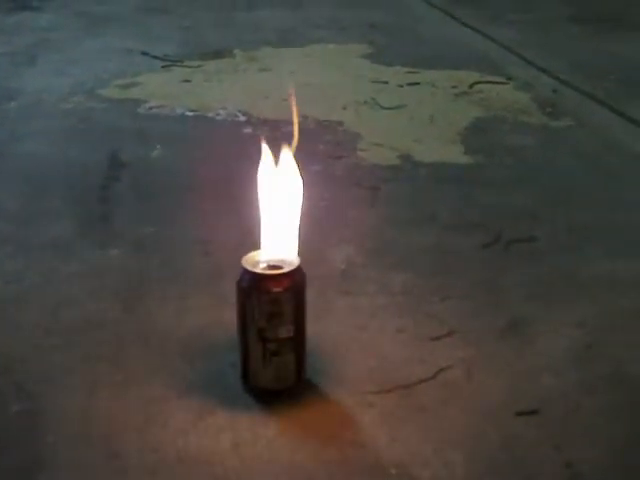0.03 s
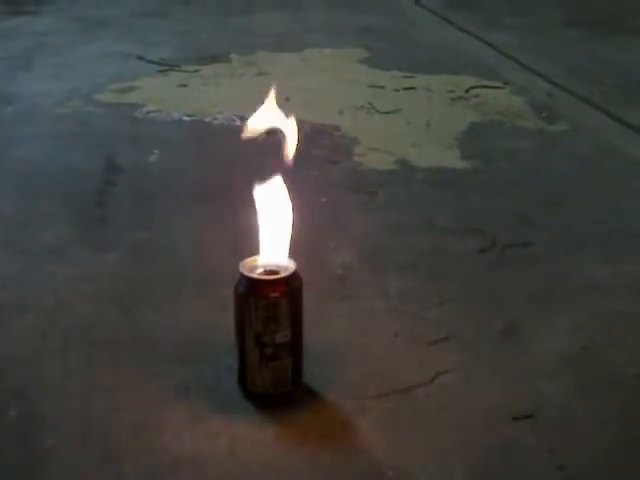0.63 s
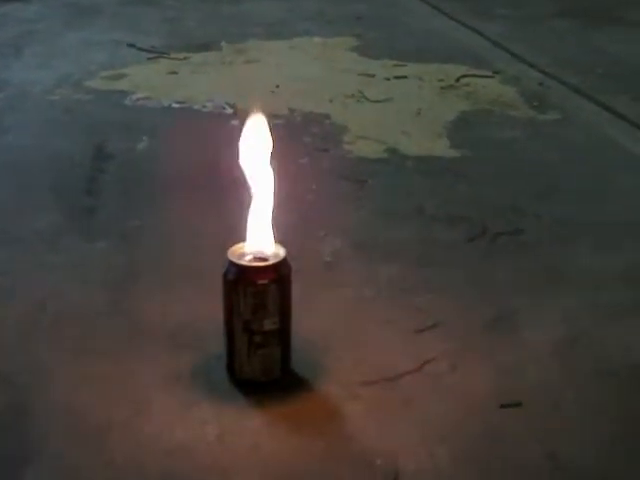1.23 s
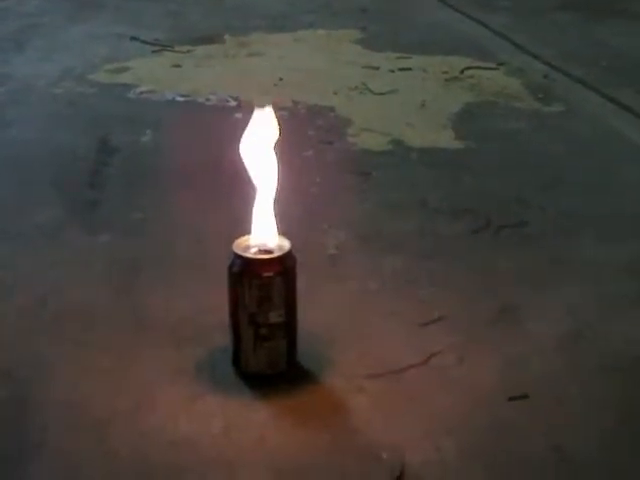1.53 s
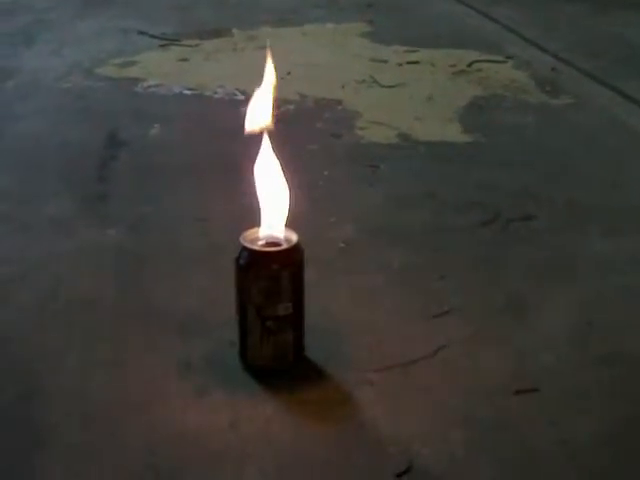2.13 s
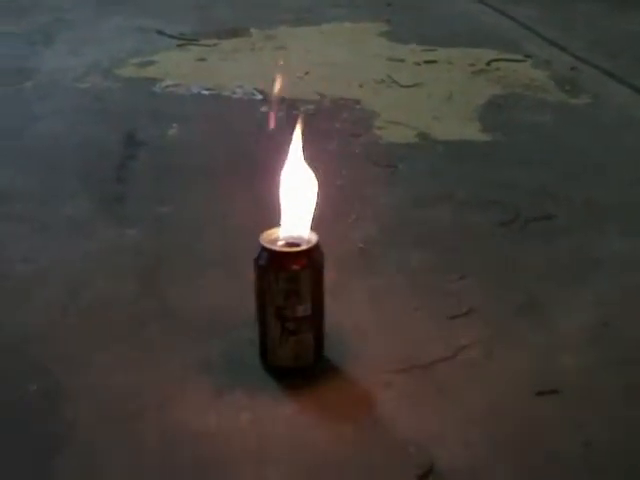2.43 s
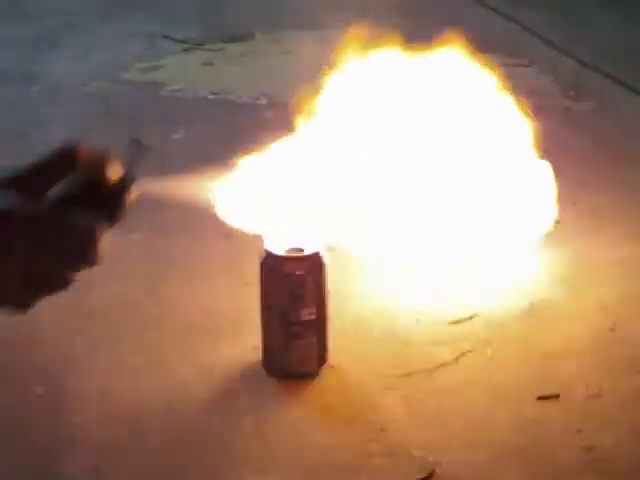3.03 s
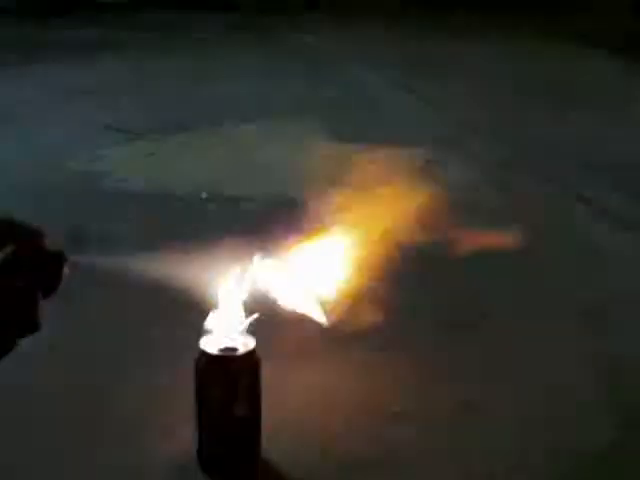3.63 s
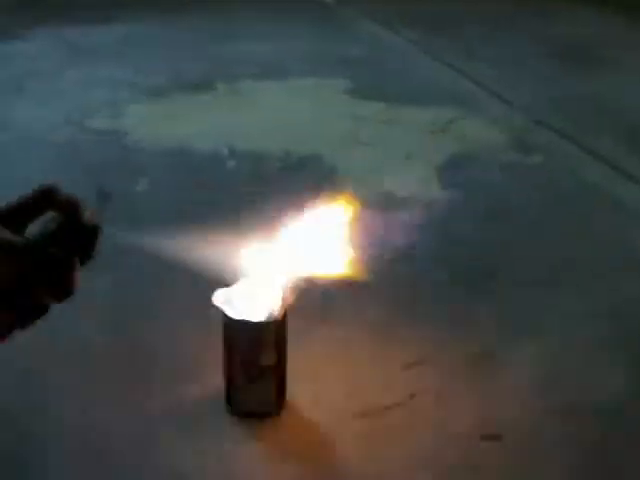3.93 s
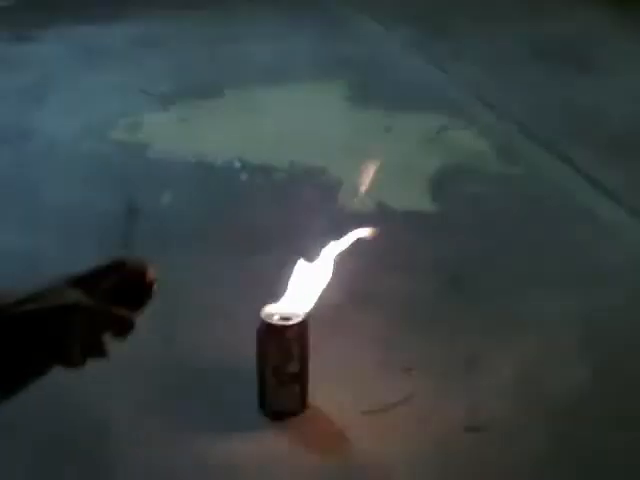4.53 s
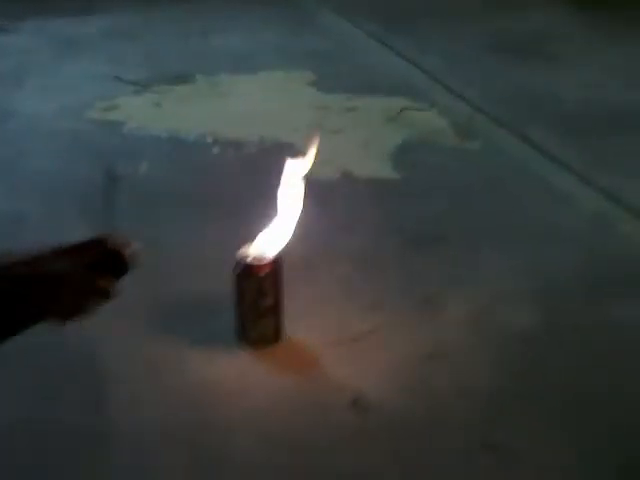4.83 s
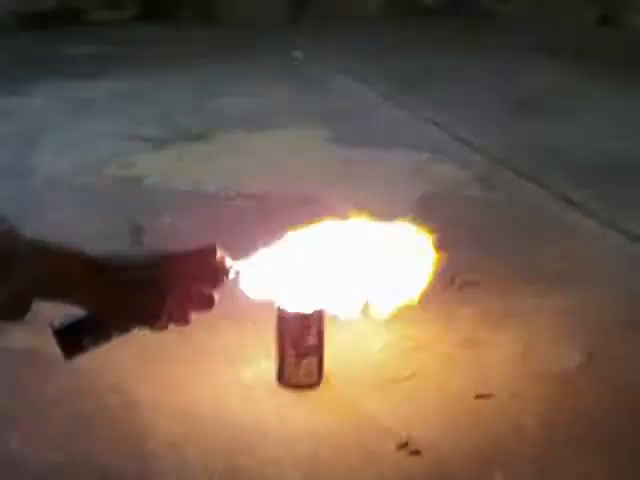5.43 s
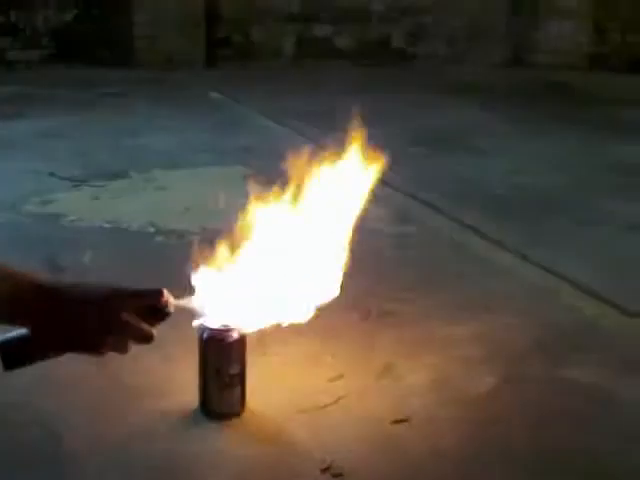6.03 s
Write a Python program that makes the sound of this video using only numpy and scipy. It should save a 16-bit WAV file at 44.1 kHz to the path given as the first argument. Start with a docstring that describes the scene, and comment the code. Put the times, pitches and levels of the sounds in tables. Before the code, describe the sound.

Faint shoe scuffs and a couple of small knocks sound over a low rumble and a distant engine in a concrete hall. Then an aerosol can hisses sharply, and the mist catches with a puff and burns in a deep, surging roar. It stops, and a hand rubs and taps on the microphone. A second hissing spray ignites and roars steadily to the end.

```python
"""In a concrete hall, over rumble and far traffic, an engine drones and shoes scuff the floor.
An aerosol is sprayed twice through a small flame on a drink can: the turbulent jet hisses at the
nozzle, and the mist ignites with a puff and burns in a flapping roar. A hand knocks on the camera,
ringing the modes of its shell, and rubs over it with stick-slip friction between the bursts."""
import sys
import numpy as np
from scipy import signal
from scipy.fft import rfft, irfft
from scipy.io import wavfile
from scipy.ndimage import uniform_filter1d

SR = 44100
rng = np.random.default_rng(int(sys.argv[2]) if len(sys.argv) > 2 else 0)


def materialize(psi):
    """Save the field psi as 16-bit PCM at rate SR to the path in sys.argv[1].

    A 1-D psi becomes a single channel; in a 2-D psi each row is a channel.
    """
    bounded = np.clip(np.atleast_2d(psi).T, -1, 1)
    quanta = np.round(bounded * 32767).astype(np.int16)
    wavfile.write(sys.argv[1], SR, quanta)


N = 276948
TIME = np.arange(N) / SR


def from_db(db):
    """Amplitude ratio of a level."""
    return 10 ** (np.asarray(db) / 20)


def unit_rms(x):
    """Normalisation to unit power."""
    return x / np.sqrt(np.mean(x ** 2) + 1e-20)


def level_curve(rows):
    """Gain interpolated in dB between points in time."""
    return from_db(np.interp(TIME, *np.transpose(rows)))


def bin_gains(spectrum):
    """Frequency response, interpolated in dB on a logarithmic axis."""
    hz, *columns = np.transpose(spectrum)
    bins = np.arange(1, N // 2 + 2) * SR / N
    return from_db([np.interp(np.log(bins), np.log(hz), db) for db in columns])


def coloured(x, spectrum):
    """Spectral shaping, at unit power."""
    return unit_rms(irfft(rfft(x) * bin_gains(spectrum), N))


def drift(hz):
    """Slow random fluctuation: low-passed noise of unit power."""
    step = 40  # samples between points
    pole = np.exp(-2 * np.pi * hz * step / SR)
    noise = rng.standard_normal(N // step + 2002)
    slow = signal.lfilter([1], [1, -2 * pole, pole * pole], noise)[2000:]
    return np.interp(np.arange(N) / step, np.arange(len(slow)), unit_rms(slow))


def grains(per_s, spread_db):
    """Shot noise: random impulses of uneven size and sign, at unit power."""
    sizes = from_db(spread_db * np.minimum(rng.exponential(1, N), 4)) * rng.choice([-1, 1], N)
    return unit_rms(sizes * (rng.random(N) < per_s / SR))


def held(start, rise, until, decay_db_per_s):
    """Envelope with a linear rise, a hold and an exponential decay."""
    return np.clip((TIME - start) / rise, 0, 1) * from_db(-decay_db_per_s * np.maximum(TIME - until, 0))


def strokes(rows, sharpness):
    """Summed swells. Each row: peak time, rise and fall in seconds, level in dB."""
    return sum(from_db(db) * np.interp(TIME - peak, [-rise, 0, fall], [0, 1, 0]) ** sharpness
               for peak, rise, fall, db in rows)


def resonate(x, hz, width_hz, boost_db):
    """Resonance lifts a narrow band."""
    r = np.exp(-np.pi * width_hz / SR)
    poles = [1, -2 * r * np.cos(2 * np.pi * hz / SR), r * r]
    band = signal.lfilter(np.array([1, 0, -1]) * (1 - r * r) / 2, poles, x)
    return x + (from_db(boost_db) - 1) * band


def ring(force, hz, t60):
    """Damped oscillator: each impulse starts a decaying sine."""
    r, w = from_db(-60 / (t60 * SR)), 2 * np.pi * hz / SR
    return signal.lfilter([0, np.sin(w)], [1, -2 * r * np.cos(w), r * r], force + 1e-18)


def reflected(x, latest_s, echo_db, count):
    """Interference with early reflections ripples the spectrum; power is kept."""
    lags = (rng.uniform(.1, 1, count) * latest_s * SR).astype(int)
    gain = from_db(echo_db)
    echoes = sum(rng.choice([-1, 1]) * np.pad(x, [(0, 0), (lag, 0)])[:, :N] for lag in lags)
    return (x + gain * echoes / np.sqrt(count)) / np.sqrt(1 + gain ** 2)


# What the two microphone ports do not share. Each row: frequency in Hz, side relative to mid in dB.
SIDE_SPECTRUM = [(60, -18), (150, -34), (250, -25.5), (500, -22), (1000, -12), (2500, -14), (4500, -5.5),
                 (7000, -0.5), (10000, -3), (15000, -3.5)]

def air_noise():
    """Spatial coherence: white noise at two close ports is alike in the bass, less so in the treble."""
    mid, side = rfft(rng.standard_normal((2, N)))
    side_gain = bin_gains(SIDE_SPECTRUM)
    ports = unit_rms(mid + side_gain * side * [[1], [-1]])
    return unit_rms(irfft(ports / np.hypot(1, side_gain), N))


# Spectra of the rumble and the traffic. Each row: frequency in Hz, relative level in dB.
RUMBLE_SPECTRUM = [(15, -4), (35, -7.5), (50, 0.5), (75, 0.5), (115, -3.5), (170, -9.5), (250, -6.5),
                   (330, -11), (600, -31), (1500, -80)]
TRAFFIC_SPECTRUM = [(150, -16), (330, 0.5), (650, 1.5), (1100, -4), (1700, -10.5), (3000, -19), (6000, -33)]
# Spectrum of the air hiss. Each row: frequency in Hz, left and right relative levels in dB.
AIR_SPECTRUM = [(1200, 8, -20), (3250, 7, 4.5), (4170, 3.5, 3.5), (6200, 2.5, 4.5), (8100, 8, 8),
                (9540, 12, 0), (11500, 1, -4), (15000, -11, -11)]
# Swells of the traffic and the air hiss. Each row: time in seconds, level in dB.
TRAFFIC_LEVELS = [(0, -53.5), (1.2, -51), (1.55, -48.5), (2.5, -50.5)]
AIR_LEVELS = [(0, -54.5), (.17, -64), (.65, -59), (1.5, -57), (2.7, -54.5)]

def hall():
    """Ambient noise is a superposition of steady rumble, far traffic and air hiss."""
    rumble = from_db(-47) * coloured(air_noise(), RUMBLE_SPECTRUM)
    traffic = level_curve(TRAFFIC_LEVELS) * coloured(air_noise(), TRAFFIC_SPECTRUM)
    air = level_curve(AIR_LEVELS) * coloured(air_noise(), AIR_SPECTRUM)
    return rumble + traffic + air


# The engine's firing rate and overtones. Each row: frequency in Hz, level in dB before the load gain.
ENGINE_HARMONICS = [(80.7, -47), (161.5, -50.5), (242.2, -60)]

def engine():
    """Periodic firing gives a harmonic series, which grows louder under load and then eases off."""
    clock = np.cumsum(1 + 0.0089 * drift(hz=2.9)) / SR
    harmonics = sum(from_db(db + 2.2 * drift(hz=3.1)) * np.sin(2 * np.pi * hz * clock)
                    for hz, db in ENGINE_HARMONICS)
    idle = from_db(-15.5)
    load = from_db(-0.5) * held(start=1.72, rise=0.35, until=2.07, decay_db_per_s=4)
    return np.sqrt(2) * (idle + load) * harmonics


def whine(hz=7867, level_db=-61):
    """A faint pure tone from the camera's electronics, in the right channel."""
    return from_db(level_db) * np.sin(2 * np.pi * hz * TIME) * [[0], [1]]


# Spectrum of grit under a sole. Each row: frequency in Hz, left and right relative levels in dB.
GRIT_SPECTRUM = [(500, -17, -8), (1160, -2, 1.5), (2200, 2.5, -1.3), (2960, -2, -5), (4330, -1.5, -5.5),
                 (6260, -8, -8), (7940, -1, 1), (9600, 5.5, -10), (11500, -7, -13), (15000, -18, -22)]
# Shoe scuffs. Each row: peak time in seconds, level in dB, resonance in Hz, its boost in dB.
SHOE_SCUFFS = [(.262, -45.5, 3040, 8.5), (0.978, -45, 1900, 10), (1.236, -52.5, 2600, 0),
               (1.55, -50.5, 3000, 4), (1.96, -59, 3300, 3), (2.08, -53.5, 2400, 6), (2.6, -51.5, 3200, 2)]

def shoes(rise_s=0.023, fall_s=0.1):
    """Sliding friction: soles drag grit over concrete, each with its own resonance; a heel taps once."""
    grit = coloured(air_noise() + .5 * grains(per_s=1800, spread_db=3), GRIT_SPECTRUM)
    scuffs = sum(strokes([(s, rise_s, fall_s, db)], sharpness=0.71) * resonate(grit, hz, 710, boost_db)
                 for s, db, hz, boost_db in SHOE_SCUFFS)
    heel = strokes([(1.4925, .0005, .016, -53)], sharpness=1.1)
    return scuffs + heel * resonate(grit, hz=1560, width_hz=610, boost_db=19.5)


# Knocks on the camera. Each row: start in seconds, force level in dB, left minus right in dB,
# contact bandwidth in Hz, chatter decay time in seconds.
CONTACTS = [(0.7004, -21, 1, 2000, 0.01), (0.74, -20, -6, 1400, .008), (0.8365, -36.5, -6, 6000, .006),
            (1.9754, -34.5, 1, 6000, .004), (4.4452, -20.5, -1, 9000, 0.0037),
            (4.6360, -9, -9, 14000, .0015), (4.7315, -22.5, -10, 3000, 0.0011), (4.7666, -7, -5, 900, .003),
            (4.8, -20.5, -15, 5950, 0.0037), (4.9334, -18.5, -9, 7000, .004), (4.995, -8, -1, 800, 0.0047),
            (5.11, -32, -9, 1800, 0.0026)]
# Modes of the camera shell. Each row: frequency in Hz, relative level in dB, 60 dB decay in seconds.
SHELL_MODES = [(430, -33, .018), (1020, -20.5, 0.012), (1490, -19.5, 0.0085), (2460, -18, 0.0067),
               (3360, -18.5, 0.0068), (4440, -7, 0.0029), (5740, -11.5, 0.0047), (6730, -4, 0.0037),
               (8100, -1, 0.0023), (9400, 0.5, 0.0025)]

def knocks():
    """Impact excitation: a blow and its chatter ring the shell's modes; softer contacts sound duller."""
    force, t = np.zeros((2, N)), np.arange(SR // 20) / SR
    for start, level_db, pan_db, bandwidth_hz, chatter_s in CONTACTS:
        chatter = np.exp(-t / chatter_s) * np.sqrt(2 / (chatter_s * SR))
        blow = 2.2 * rng.standard_normal((2, len(t))) * chatter
        blow[:, 0] += 1  # the first impact
        softness = np.exp(-2 * np.pi * bandwidth_hz / SR)
        port_gains = from_db(level_db + pan_db * np.array([[.5], [-.5]]))
        at = round(start * SR)
        force[:, at:at + len(t)] += port_gains * signal.lfilter([1 - softness], [1, -softness], blow)
    modes = sum((-1) ** k * from_db(db - 4) * ring(force, hz, t60)
                for k, (hz, db, t60) in enumerate(SHELL_MODES))
    return signal.sosfilt(signal.butter(4, 12300, fs=SR, output="sos"), modes)


def thin_hiss():
    """Narrow-band noise swells faintly and fades before the first burst."""
    band = coloured(air_noise(), [(2400, -37), (3230, 2), (4000, -34)])
    return strokes([(1.9, .42, .95, -67)], sharpness=0.45) * band


def floor_bounce(x, delay_s, sway, echo_db):
    """Comb filtering by the floor's echo; the notches slide as the hand wanders."""
    now = np.arange(N)
    then = now - delay_s * SR * (1 + sway * drift(hz=0.85))
    return x + from_db(echo_db) * np.array([np.interp(then, now, channel) for channel in x])


# Spectrum of the jet. Each row: frequency in Hz, left and right relative levels in dB.
JET_SPECTRUM = [(300, -49, -32), (1050, -12.5, -12.5), (1890, -15.5, -16.5), (3200, -17.5, -17.5),
                (5030, -15, -15), (6880, -15, -12.5), (7970, -5, -3.5), (8200, -6.5, -5.5), (9300, 1, -8.5),
                (10300, -2, -15), (11000, -7.5, -11.5), (13100, -10, -17), (15400, -18.5, -14)]
# Spectrum of the mist. Each row: frequency in Hz, relative level in dB.
MIST_SPECTRUM = [(600, -23), (1100, -26), (1900, -9), (3200, 8), (5000, -0.5), (7000, 8), (12000, -23),
                 (15000, -23)]
# Early spurts. Each row: peak time in seconds, added flow in dB relative to the steady jet.
JET_SPURTS = [(2.9, 4.5), (3.11, 3.5), (3.28, -0.5), (3.39, 0.5)]
# Presses of the nozzle. Each row: start and end in seconds, jet and mist levels in dB,
# mist resonance in Hz, its boost in dB.
NOZZLE_PRESSES = [(2.84, 4.143, -28.5, -41.6, 1700, 6), (5.292, 6.3, -30.5, -41, 2450, 6)]

def spray(spurt_rise_s=0.17, spurt_fall_s=0.09):
    """Jet noise: the nozzle sputters and hisses; the duller rush of the mist grows less with flow."""
    flow = 1 + strokes([(s, spurt_rise_s, spurt_fall_s, db) for s, db in JET_SPURTS], sharpness=1.16)
    sputter = from_db(drift(hz=78))
    jet = sputter * flow * coloured(air_noise(), JET_SPECTRUM)
    mist = flow ** 0.75 * coloured(air_noise(), MIST_SPECTRUM)
    hiss = 0
    for start, end, jet_db, mist_db, hz, boost_db in NOZZLE_PRESSES:
        valve = held(start, rise=0.083, until=end, decay_db_per_s=259.5)
        hollow_mist = resonate(mist, hz, width_hz=600, boost_db=boost_db)
        hiss += valve * (from_db(jet_db) * jet + from_db(mist_db) * hollow_mist)
    hiss = floor_bounce(hiss, delay_s=0.001092, sway=0.049, echo_db=-15)
    return reflected(hiss, latest_s=.02, echo_db=-8.5, count=24)


def blaze(flares, decay_db_per_s, sag_db_per_s=5.5):
    """Exponential decay: a flare sags while fed and dies when the fuel stops; the strongest leads."""
    envelopes = []
    for start, rise, until, db in flares:
        fed_s = np.maximum(np.minimum(TIME, until) - start - rise, 0)
        envelopes.append(from_db(db - sag_db_per_s * fed_s) * held(start, rise, until, decay_db_per_s))
    return np.max(envelopes, axis=0)


# Spectrum of the roar. Each row: frequency in Hz, relative level in dB.
ROAR_SPECTRUM = [(20, -13), (38, -5), (50, -15.5), (70, 0), (84, -0.5), (100, -6), (114, 0.5), (138, -7.5),
                 (160, -5.5), (210, -15), (240, -10.5), (260, -15), (400, -19.5), (700, -41.5), (4000, -99)]
# Resonances in the roar. Each row: frequency and bandwidth in Hz, boost in dB.
ROAR_RESONANCES = [(282, 15, 5), (350.7, 12.7, 8)]

def flame_front(flap_resonance, limit=4.2):
    """Irregular oscillation: the flame flaps at steady power; saturation rounds the widest swings."""
    flaps = coloured(air_noise() + 0.67 * grains(per_s=270, spread_db=2), ROAR_SPECTRUM)
    for hz, width_hz, boost_db in [flap_resonance, *ROAR_RESONANCES]:
        flaps = resonate(flaps, hz, width_hz, boost_db)
    running_rms = np.sqrt(uniform_filter1d(np.mean(flaps ** 2, 0), size=2000))
    return limit * np.tanh(flaps / running_rms / limit)


# Spectrum of the fire's turbulence. Each row: frequency in Hz, relative level in dB.
TURBULENCE_SPECTRUM = [(250, -9), (450, 3.5), (620, -0.5), (830, -7.5), (1050, -7), (1400, -13.5),
                       (2000, -11), (3500, -20.5), (8000, -23), (14000, -34)]
# Puffs as the mist catches. Each row: peak time in seconds, level in dB.
IGNITION_PUFFS = [(2.895, -34), (3.982, -38), (5.421, -31.5)]
# Flapping per burst, deeper in the big first one. Each row: frequency and bandwidth in Hz, boost in dB.
FLAP_RESONANCES = [(81.7, 35, 4), (162.8, 24, 4.5)]
# Flares, one list per burst. Each row: start, rise time and end in seconds, level in dB.
BURST_FLARES = [
    [(2.885, 0.012, 3.344, -16), (3.38, 0.088, 3.564, -12), (3.6, 0.076, 3.82, -21),
     (3.965, 0.029, 4.13, -11.5)],
    [(5.345, .015, 5.4, -28.5), (5.397, .025, 5.43, -16.5), (5.4, .3, 6.3, -12.8)],
]

def fireball(puff_rise_s=.012, puff_fall_s=0.14):
    """Combustion noise: the mist catches with a puff and roars; each flap modulates the turbulence."""
    turbulence = coloured(air_noise() + .5 * grains(per_s=500, spread_db=3.5), TURBULENCE_SPECTRUM)
    puffs = strokes([(s, puff_rise_s, puff_fall_s, db) for s, db in IGNITION_PUFFS], sharpness=2.9)
    roar, rush = 0, puffs * turbulence
    for flap_resonance, flares in zip(FLAP_RESONANCES, BURST_FLARES):
        flaps = flame_front(flap_resonance)
        burn = blaze(flares, decay_db_per_s=62)
        afterburn = from_db(-7.5) * blaze(flares, decay_db_per_s=22)  # the remaining fuel flaps on
        roar += np.maximum(burn, afterburn) * flaps
        surge = unit_rms(from_db(-1.8 * np.clip(flaps[0], -2, 2)))
        rush += from_db(-18) * blaze(flares, decay_db_per_s=84.5) ** 0.9 * surge * turbulence
    return roar + reflected(rush, latest_s=.04, echo_db=-8, count=12)


# Spectrum of skin on the shell. Each row: frequency in Hz, left and right relative levels in dB.
RUB_SPECTRUM = [(250, -18, -18), (700, -7, -5), (1100, -5, 0), (2200, -16, -9), (3400, -17, -7),
                (4200, -16, -5), (5400, -16, -8), (6600, -12, -3), (7500, -12, -8), (9200, -5, -6),
                (10600, -13, -13), (12800, -27, -26), (15000, -25, -24)]
# Slides of the hand. Each row: peak time and duration in seconds, level in dB.
HAND_SLIDES = [(4.367, 0.053, -41), (4.448, 0.089, -39), (4.496, 0.072, -33), (4.564, 0.069, -39.5),
               (4.669, 0.086, -38.5), (4.792, 0.077, -35.5), (4.854, 0.041, -34.5), (4.924, .065, -33.5),
               (4.978, 0.061, -31.5), (5.02, .06, -44), (5.063, 0.062, -36.5), (5.274, .05, -45)]

def hand_rub():
    """Stick-slip friction: skin moves over the hollow camera shell in dense, tiny jerks."""
    jerks = air_noise() + grains(per_s=1400, spread_db=3)
    slips = resonate(coloured(jerks, RUB_SPECTRUM), hz=1050, width_hz=220, boost_db=3.5)
    pressure = strokes([(s, length / 2, length / 2, db) for s, length, db in HAND_SLIDES], sharpness=1.11)
    return pressure * from_db(1.25 * drift(hz=40)) * slips


def scene():
    """Superposition: the pressures of all sources add at the two ports."""
    return spray() + fireball() + shoes() + hand_rub() + knocks() + hall() + thin_hiss() + engine() + whine()


def record(dry, cutoff_hz=15400):
    """Band limiting: a steep low-pass filter removes the highest treble."""
    return signal.sosfilt(signal.ellip(10, .1, 80, cutoff_hz, fs=SR, output="sos"), dry)


dry = scene()
out = record(dry)
materialize(out)
```